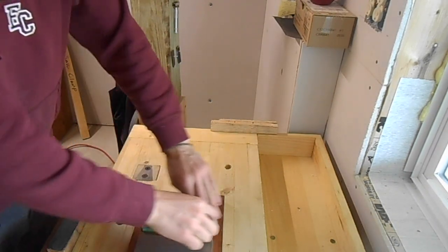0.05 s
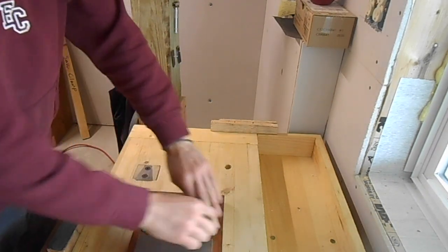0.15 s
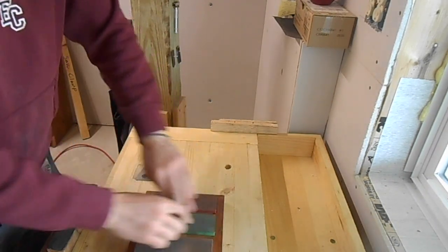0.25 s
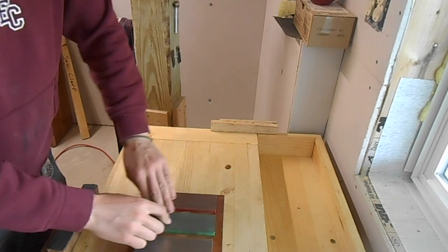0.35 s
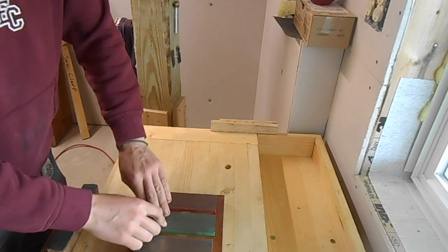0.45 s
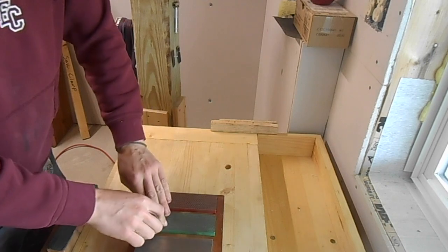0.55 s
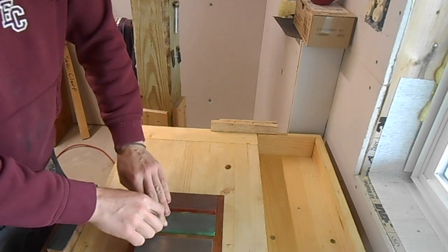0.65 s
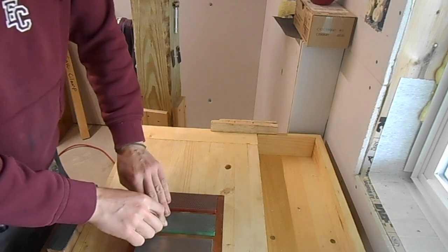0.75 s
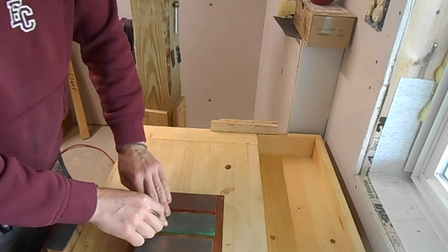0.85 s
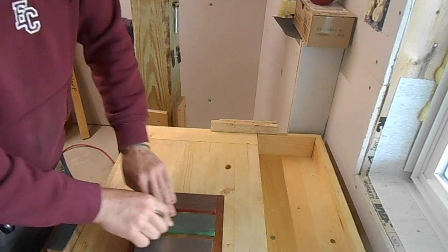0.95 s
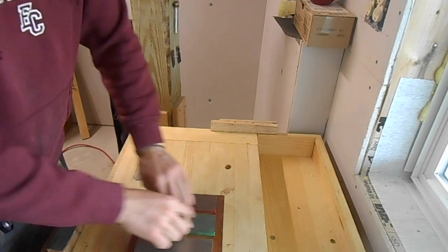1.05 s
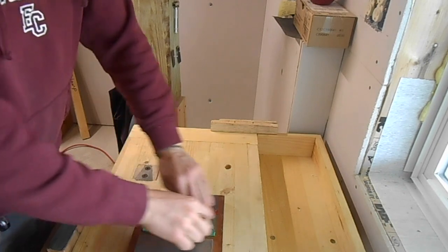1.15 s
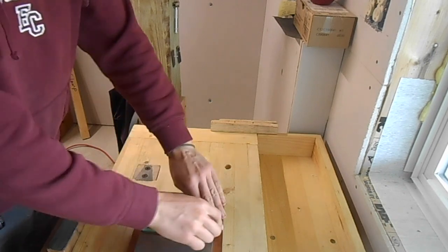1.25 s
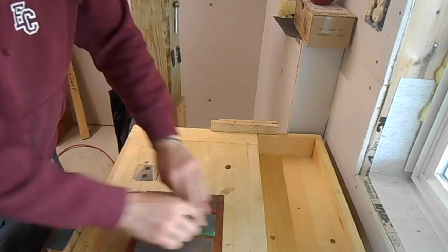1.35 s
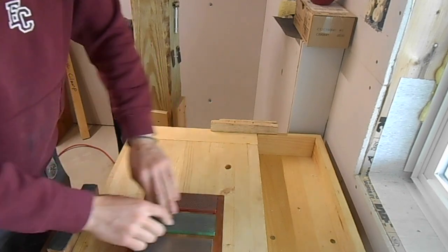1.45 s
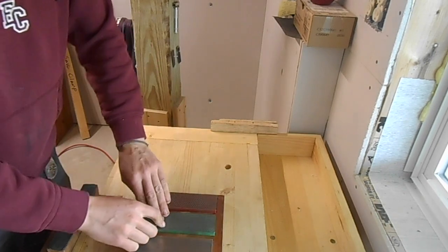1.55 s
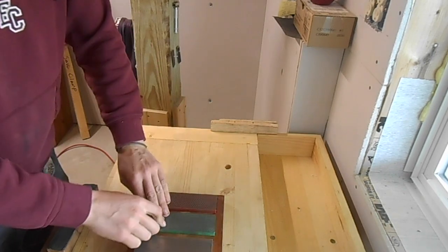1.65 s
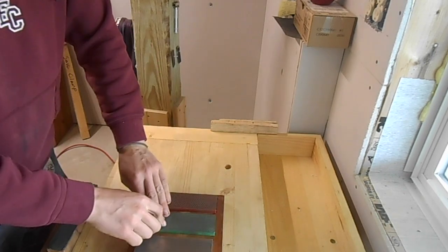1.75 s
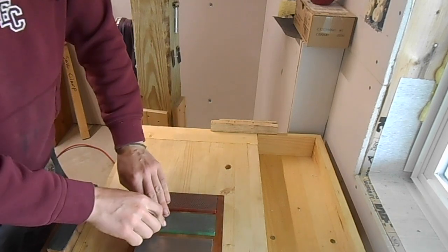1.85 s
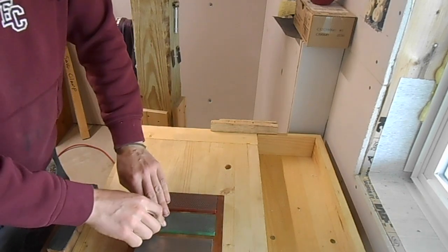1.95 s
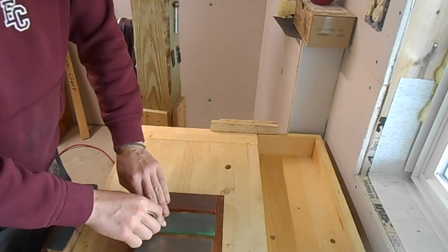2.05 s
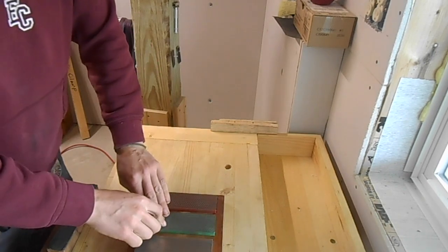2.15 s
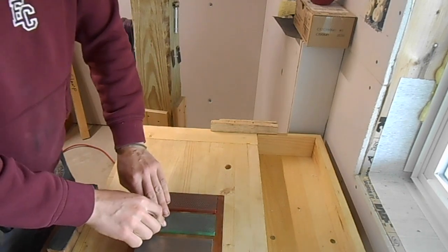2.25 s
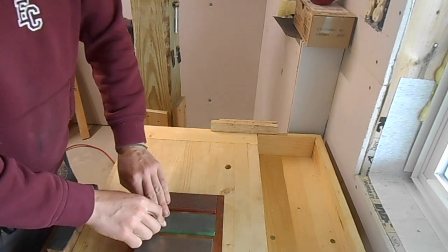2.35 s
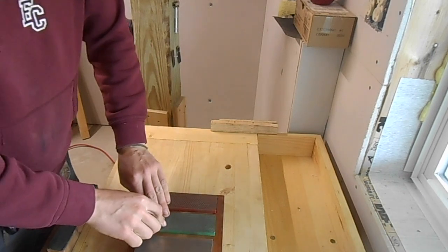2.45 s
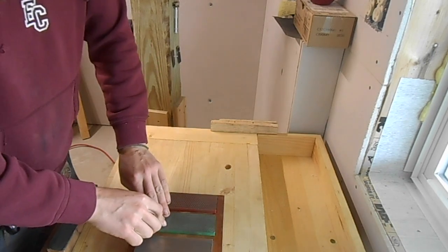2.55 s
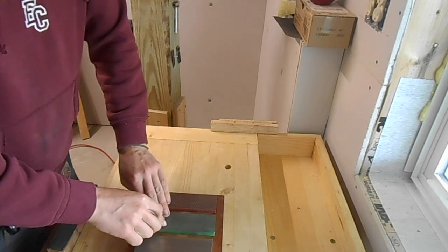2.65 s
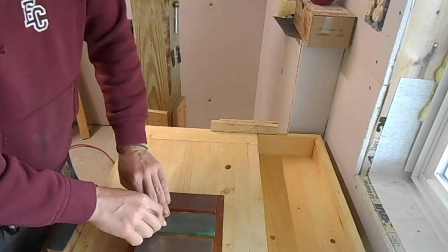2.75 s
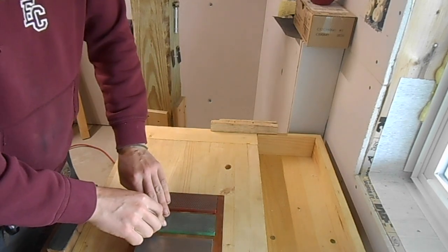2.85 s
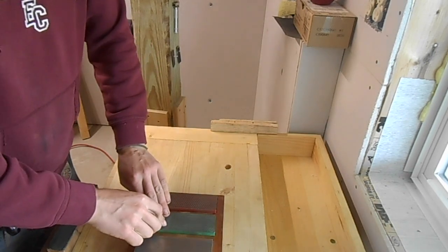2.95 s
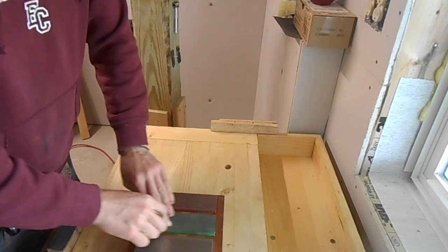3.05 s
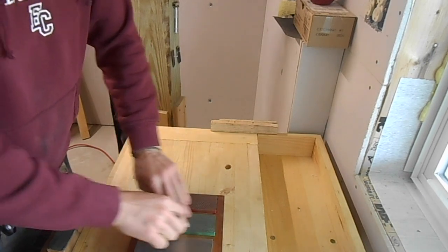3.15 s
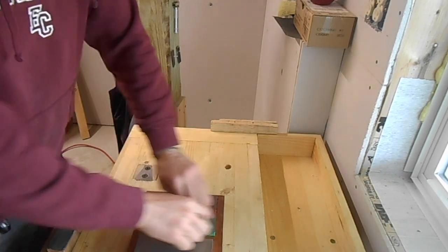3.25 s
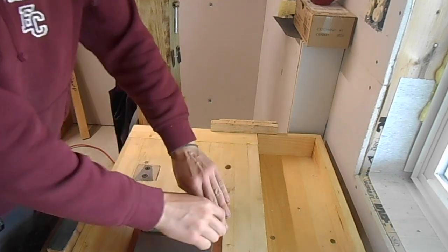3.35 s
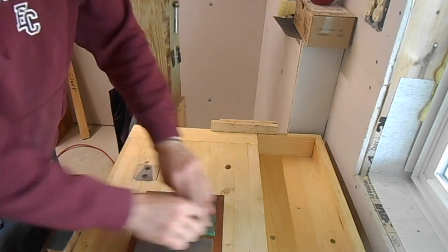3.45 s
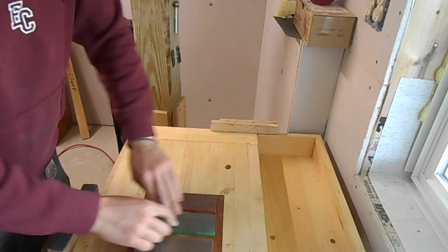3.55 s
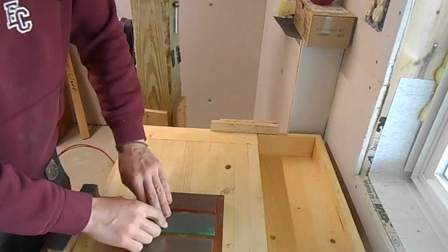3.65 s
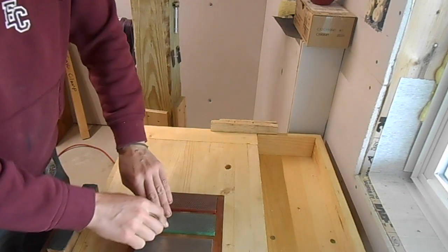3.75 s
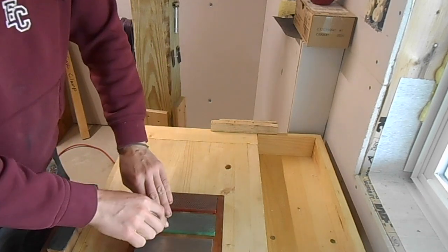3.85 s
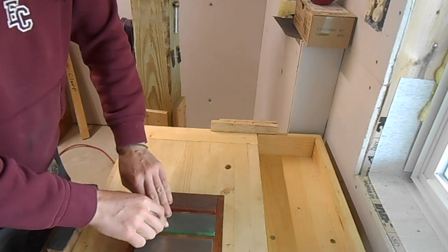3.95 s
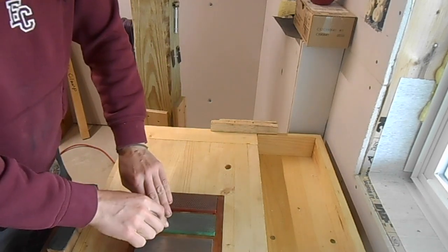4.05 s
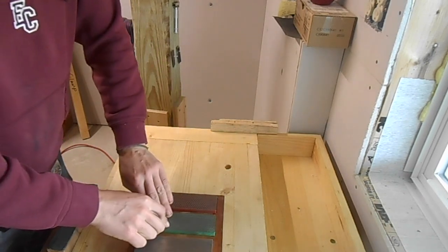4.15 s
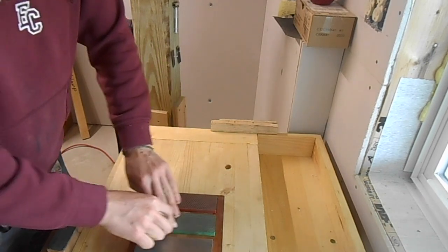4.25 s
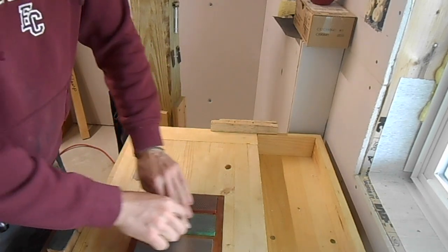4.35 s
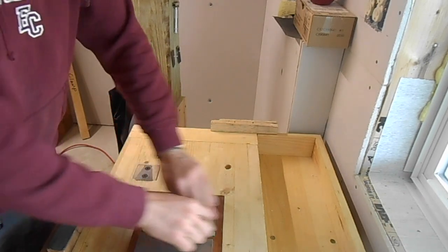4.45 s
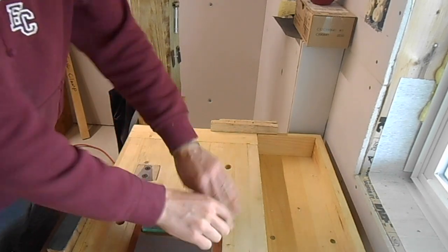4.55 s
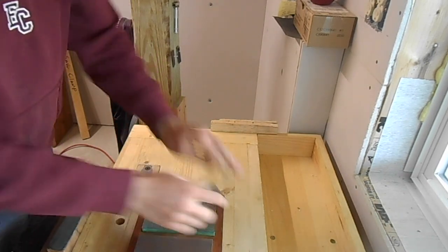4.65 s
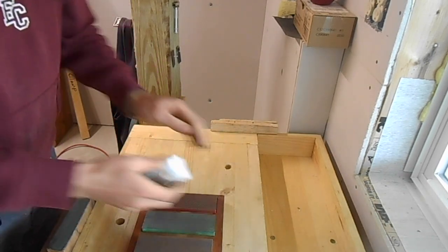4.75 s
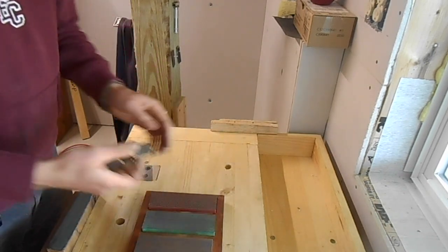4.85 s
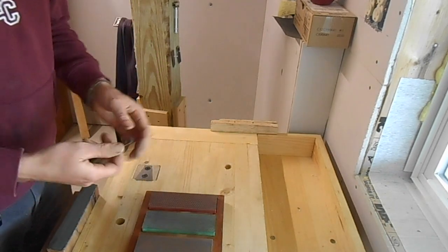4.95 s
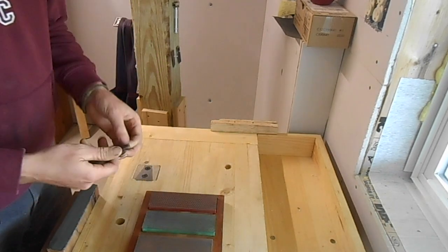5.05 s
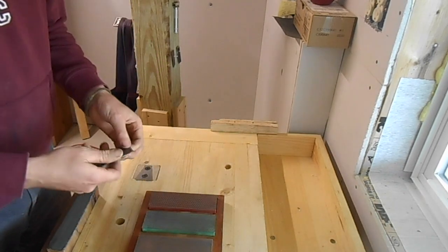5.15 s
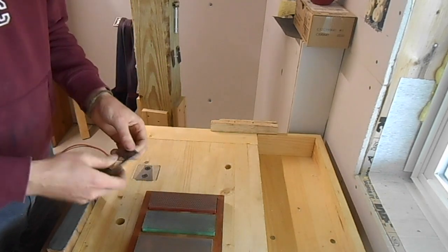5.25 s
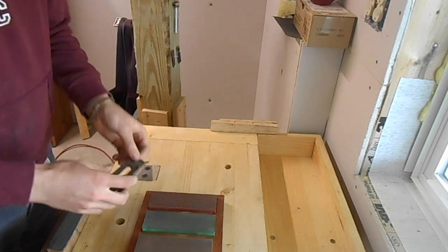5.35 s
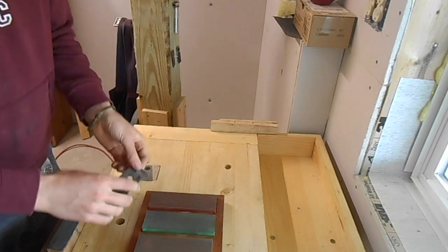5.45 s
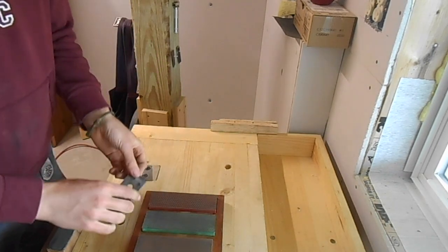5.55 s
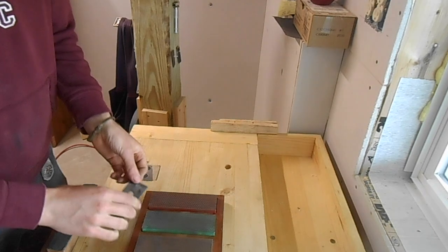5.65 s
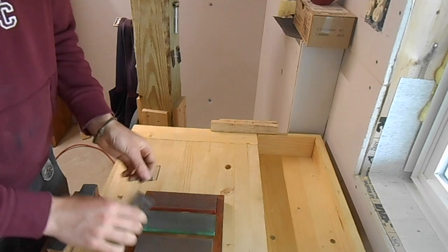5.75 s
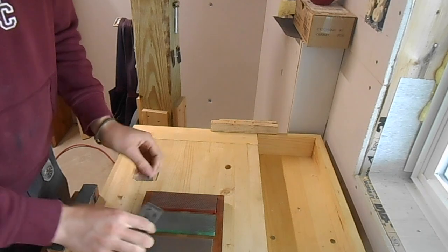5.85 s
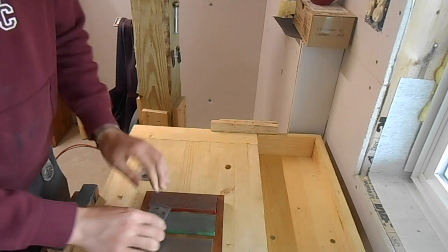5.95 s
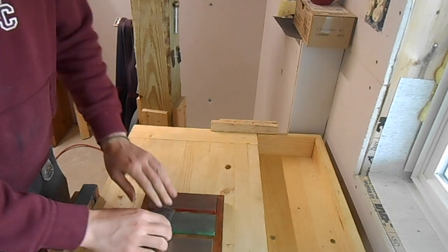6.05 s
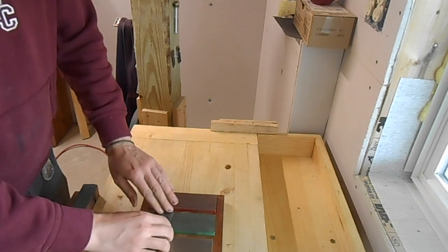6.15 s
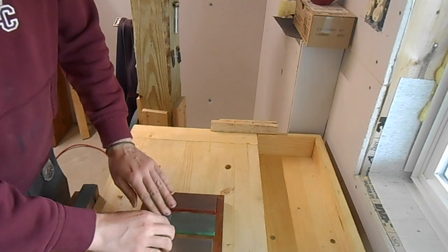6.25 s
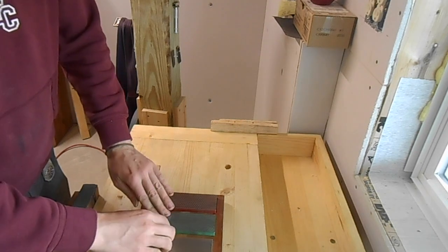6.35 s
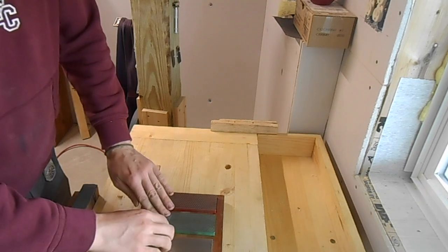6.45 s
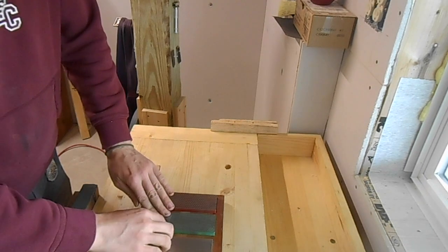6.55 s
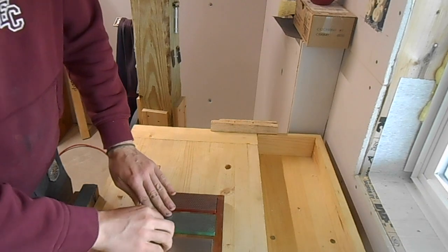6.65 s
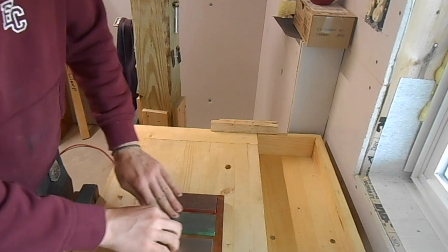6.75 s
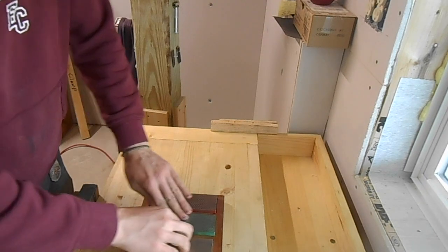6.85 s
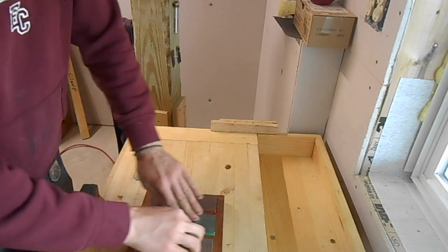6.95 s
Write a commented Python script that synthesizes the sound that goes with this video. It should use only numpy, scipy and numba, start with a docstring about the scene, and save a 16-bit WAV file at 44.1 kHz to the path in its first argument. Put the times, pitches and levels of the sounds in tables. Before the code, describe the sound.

Close up in a small, quiet workshop, steel scrapes over a gritty sharpening stone on a wooden bench. Two brief strokes, a pause, then two more, each stopping with a thump and most followed by a light metallic clack. Sleeves rustle and skin squeaks faintly over the edge. Near the end the blade touches the stone twice with a slight ring, and a lighter, more ringing rasp starts.

```python
"""Sharpening a blade at the bench

A small workshop, one microphone close to a coarse stone on a wooden bench. Grit rasps under the
steel edge; each push ends in dull knocks, and between pushes the blade is set down with a clack.
Fingers wipe the edge with faint squeaks, the blade is put back and a lighter stroke begins.
Sleeves rustle, the near walls answer briefly, and a steady room tone lies behind it all."""
import sys
import numpy as np
from scipy import signal
from scipy.fft import rfft, irfft
from scipy.io import wavfile
from scipy.ndimage import uniform_filter1d
from numba import njit

SR = 44100
rng = np.random.default_rng(int(sys.argv[2]) if len(sys.argv) > 2 else 0)


def store_pcm(level_fs):
    """Save levels as 16-bit WAV."""
    pcm = np.round(np.clip(level_fs, -1, 1) * 32767).astype(np.int16)
    wavfile.write(sys.argv[1], SR, np.atleast_2d(pcm).T)


N = 308259
TIME = np.arange(N) / SR
TOP_HZ = 10250
STROKE_RELEASE_S = 0.019

# pushes along the stone; slow start and body are relative to the level:
# start_s, length_s, bear_down_s, speed_up_s, level_db, slow_db, body_db
PUSHES = [(-0.2, 0.35, 0.08, 0.26, -35.7, -6, -2), (0.955, 0.348, 0.02, 0.2, -38.5, -6, 0.3),
          (3.041, 0.37, 0.12, 0.23, -36.5, -11, -1.8), (4.189, 0.41, 0.11, 0.32, -38, -10.5, 1)]
# resonances of the sliding blade: pitch_hz, width_hz, level_db, full_speed_rise_ratio
EDGE_PEAKS = [(1163, 80, -6.5, 0.046), (1777, 97, -5.5, 0.02), (2330, 200, -5.5, 0.03),
              (2550, 150, -13.5, .05), (3350, 360, 1.6, 0.11), (5600, 170, -14.5, 0.055),
              (6200, 120, -12, 0.033), (6820, 120, -11, .025), (7820, 180, -9.5, 0.015),
              (8800, 150, -4.5, 0.0045)]
# spectra of the grit's hiss, the rasp's body and the bench's rumble: pitch_hz, level_db
HISS_COLOUR = [(1000, -19.5), (3000, -17.5), (4200, 0.5), (4800, 3.5), (6200, -2), (7300, 0.5), (8300, 6),
               (9000, 1.5), (9900, 0), (10200, -19)]
RASP_COLOUR = [(180, -9.5), (400, -3), (600, 4), (1150, -5), (1450, -2.5), (1800, 1), (2100, 0), (2400, 1),
               (3100, 0), (4500, -4), (8000, -34)]
RUMBLE_COLOUR = [(20, -12.5), (42, 11), (53, 1.5), (76, 6), (100, -4), (128, 0.5), (170, -17.5),
                 (230, -28.5), (295, -0.5), (360, -30), (700, -35)]
# the lighter stroke: start_s, length_s, bear_down_s, level_db, slow_db
LIGHT_STROKE = (6.722, 0.4, 0.035, -32.3, -9.5)
# its spectrum: pitch_hz, level_db
LIGHT_COLOUR = [(40, -5), (100, -10), (140, -10), (185, -17.5), (388, -11), (452, -12.5), (793, -7),
                (1100, -13), (1340, -18.5), (1820, -9), (2170, -13), (3660, -7.5), (4530, -11),
                (8410, -3.5), (10200, -12)]
# its resonances: pitch_hz, width_hz, level_db
LIGHT_PEAKS = [(810, 60, -4), (1150, 65, 9), (1820, 110, 2), (3700, 150, 1), (6030, 540, 0), (8400, 500, 1)]

# knocks that end the pushes, each led by a lighter contact; hardness is a treble cut-off:
# time_s, bench_db, steel_relative_db, hardness_hz, lead_s, lead_db, lead_hardness_hz
KNOCKS = [(0.208, -17, -4, 2750, 0.012, -19, 1500), (1.342, -14, -6, 2930, 0.009, -19, 2680),
          (3.4407, -13.5, -13, 1420, 0.011, -20.5, 955), (4.6256, -13, -8.5, 2480, 0.0225, -15.5, 990)]
# the blade is set down for the next push: time_s, bench_db, steel_db, bounce_steel_db
SET_DOWNS = [(0.4931, -20, -10, -25), (1.611, -21.5, -14, -43), (3.7127, -20.5, -15.5, -19)]
# single catches and bumps of the blade: time_s, bench_db, steel_db, hardness_hz
CATCHES = [(0.076, -43, -33, 11000), (0.125, -29, -19.5, 6500), (0.182, -25.5, -50, 1000),
           (1.122, -51, -35, 11000), (3.283, -29, -31, 7000), (3.402, -37, -30.5, 5000),
           (3.408, -23.5, -50, 880), (4.537, -32.5, -27, 10000), (5.035, -44, -37.5, 10000),
           (5.164, -48, -36, 5000), (5.217, -37.5, -41, 3000), (6.746, -48, -35.5, 11000)]
# the loosely held blade touches the stone: time_s, bench_db, steel_db, free_ring_db
TOUCHES = [(6.3334, -22, -41.5, -30.5), (6.4, -21.5, -30, -27)]
# modes of stone and bench, the hand-damped blade and the loose blade: pitch_hz, level_db, t60_s
BENCH_MODES = [(129.6, -12.5, 0.54), (299, -5, 0.16), (421, -7.5, 0.39), (463.4, -12, 0.36),
               (567, -3, 0.076), (686, -4.5, 0.07), (793, -5, 0.08), (1000, -3, 0.091), (1096, -1.5, 0.089),
               (1210, -4, 0.061), (1594, -11.5, 0.09), (1786, -7.5, 0.079), (1888, -9, 0.08)]
GRIPPED_MODES = [(2526, -2.5, 0.045), (2797, -1.5, 0.036), (3460, -1, 0.019), (3895, -4.5, 0.036),
                 (4690, -1, 0.05), (5170, 3, 0.057), (5205, -5.5, 0.02), (6300, -2, .03), (7200, -0.5, .03),
                 (8230, -7, 0.033), (8660, 5.5, 0.031)]
LOOSE_MODES = [(1690, 5, 0.15), (2870, -10, .05), (3900, -14.5, 0.22), (4640, -17, 0.06), (7030, -5, 0.02)]
# spectra of the struck bench and the struck steel: pitch_hz, level_db
BENCH_COLOUR = [(60, -7), (120, -10.5), (210, -19.5), (300, -14), (420, -4.5), (580, 0.5), (700, 1.5),
                (900, -3.5), (1100, -5.5), (1400, -15), (1900, -13), (3000, -17.5), (6000, -50)]
STEEL_COLOUR = [(400, -23.5), (1000, 0.5), (1450, -5.5), (1850, 2), (2300, -10), (2700, 0.5), (3150, -3),
                (3600, 1.5), (4500, -3), (5800, -0.5), (7500, 1), (8700, 2.5), (10200, -4)]

# fingers drag over the edge: start_s, length_s, level_db, squeak_relative_db
WIPES = [(4.868, 0.14, -43, -8.5), (4.953, 0.035, -44, -9), (5.029, 0.023, -42.5, 8),
         (5.061, 0.1, -42.5, -3), (5.111, 0.022, -50, 10.5)]
# resonances of skin squeaking on steel: pitch_hz, width_hz, level_db
SQUEAK_PEAKS = [(5890, 150, -1), (6600, 200, -3), (7100, 140, -8), (7600, 260, -21)]
# the arms draw back or handle the blade: loudest_s, rise_s, fade_s, level_db
ARM_MOVES = [(0.33, 0.18, 0.4, -47.5), (1.48, 0.063, 0.63, -55), (3.6, 0.21, 0.33, -47),
             (4.92, 0.44, 0.49, -44.5), (5.3, 0.21, 0.43, -47.5), (6.52, 0.31, 0.7, -48.5)]
# spectra of wiping skin, sleeves and room tone: pitch_hz, level_db
WIPE_COLOUR = [(300, -11), (1200, 1.5), (2200, -4), (4000, 0.5), (5200, -3), (7000, 0), (9000, 1),
               (10200, -6.5)]
SLEEVE_COLOUR = [(18, -28), (30, -12), (43, -2), (222, -14), (408, -9), (697, -11), (750, -5), (1280, -12),
                 (2040, -7.5), (2420, -17), (4300, -20.5), (5200, -23), (8390, -19), (10200, -28)]
ROOM_TONE_COLOUR = [(15, -50), (25, 4.5), (149, -9.5), (229, -10), (287, -12.5), (398, -5.5), (692, -6.5),
                    (765, -2), (867, -10), (1030, -8), (1750, -9), (2040, -5.5), (2370, -19), (2560, -15),
                    (10200, -25)]
# hollow resonances in the room tone: pitch_hz, width_hz, level_db
ROOM_TONE_PEAKS = [(794, 14, -3), (977, 130, 1.5), (2015, 190, -4.5), (2556, 57, 8.5), (8250, 1200, 3)]


def pushes(bite_db=2.5, bite_s=0.069, far_end_db=4, far_end_s=0.038, shake_release_s=0.14):
    """Grit hisses under the edge, rasps through blade and stone, and shakes the bench."""
    gain, body, shake, speed = np.zeros((4, N))
    for start, length, bear_down_s, speed_up_s, db, slow_db, body_db in PUSHES:
        pressure = envelope(start, length, bear_down_s, STROKE_RELEASE_S)
        shaking = envelope(start, length, bear_down_s, shake_release_s)
        pace = stroke_speed(start, speed_up_s)
        slowness = 1 - pace
        # the edge bites hardest on reaching full speed
        bite = np.exp(-((TIME - start - speed_up_s) / bite_s) ** 2)
        level = undb(db + slow_db * slowness + bite_db * bite)
        gain += pressure * level
        # the rasp starts thin and gains body towards the far end of the stone
        far_end = np.exp(-np.maximum(start + length - TIME, 0) / far_end_s)
        body += pressure * level * undb(body_db - 4 * slowness + far_end_db * far_end)
        shake += shaking * level * undb(body_db - 6.5 * slowness)
        speed += pressure * pace ** 4
    grains = grit(per_s=9800, spread_db=2.0, judder_db=1.06, judder_hz=55)
    hiss = patchy(colour(grains, HISS_COLOUR), depth_db=3.0)
    coarse_grains = grit(per_s=5000, spread_db=0.5, judder_db=2.0)
    rasp = patchy(colour(coarse_grains, RASP_COLOUR), depth_db=1.65)
    treble = undb(-3.0) * hiss + undb(-0.5) * edge_ring(grains, speed)
    rumble = unit(colour(rng.standard_normal(N), RUMBLE_COLOUR))
    return gain * treble + undb(-1.5) * body * rasp + undb(-4.0) * shake * rumble


def edge_ring(grains, speed, wander=0.025, wander_hz=11, swell_db=2.5):
    """The blade's resonances climb with speed, and come and go as the contact shifts along the edge."""
    ringing = np.zeros(N)
    for hz, width, db, rise in EDGE_PEAKS:
        level = undb(db + swell_db * walk(wander_hz))
        pitch_hz = hz * (1 + rise * speed + wander * walk(wander_hz))
        ringing += level * unit(bandpass(grains, pitch_hz, float(width)))
    return unit(ringing)


def light_stroke():
    """With less of the edge on the stone the rasp is thinner and rings more."""
    start, length, bear_down_s, db, slow_db = LIGHT_STROKE
    slowness = 1 - stroke_speed(start, speed_up_s=0.19)
    gain = envelope(start, length, bear_down_s, STROKE_RELEASE_S) * undb(db + slow_db * slowness)
    grains = colour(grit(per_s=8900, spread_db=1.5, judder_db=0.5), LIGHT_COLOUR)
    return gain * patchy(grains + resonate(grains, LIGHT_PEAKS), depth_db=2.5)


def stroke_speed(start, speed_up_s):
    """The hands accelerate from rest (0) to full speed (1)."""
    return np.sin(np.pi / 2 * np.clip((TIME - start) / speed_up_s, 0, 1))


def grit(per_s, spread_db, judder_db, judder_hz=70):
    """Tiny fractures of uneven size, swelling as the contact catches and slips."""
    happens = rng.random(N) < per_s / SR
    sizes = undb(spread_db * np.minimum(rng.exponential(size=N), 6))
    return unit(happens * sizes * rng.standard_normal(N)) * undb(judder_db * walk(judder_hz))


def patchy(x, depth_db, rate_hz=28, band_count=9):
    """Grit is uneven: each patch of stone stresses other parts of the treble."""
    hz = np.fft.rfftfreq(N, 1 / SR)
    centres = np.linspace(0, TOP_HZ, band_count)
    spectrum = rfft(x)
    bands = [irfft(spectrum * np.interp(hz, centres, band), N) for band in np.eye(band_count)]
    return unit(sum(band * undb(depth_db * walk(rate_hz)) for band in bands))


def contacts(rebound_s=0.016, flat_s=0.0065, bounce_s=0.0225):
    """Every blow of blade on stone: time_s, bench_db, steel_db, hardness_hz."""
    rows = list(CATCHES)
    for s, db, steel_db, hz, lead_s, lead_db, lead_hz in KNOCKS:
        rows += [(s - lead_s, lead_db, lead_db + steel_db - 7, lead_hz),
                 (s, db, db + steel_db, hz),
                 (s + rebound_s, db - 10, db + steel_db - 10, hz * 0.77)]
    # set down, the edge lands hard, the bevel drops flat, then the blade bounces once
    for s, bench_db, steel_db, bounce_db in SET_DOWNS:
        rows += [(s, bench_db, steel_db, 11000),
                 (s + flat_s, bench_db + 0.5, steel_db - 7.5, 4670),
                 (s + bounce_s, bench_db - 2.5, bounce_db, 3100)]
    return rows + [(s, bench_db, steel_db, 10200) for s, bench_db, steel_db, _ in TOUCHES]


def bench_and_steel(t):
    """Struck bench and blade each give a burst of crowded modes around a few clear ones."""
    wood, metal, tick = rng.standard_normal((3, len(t)))
    thud = undb(-3) * signal.unit_impulse(len(t)) + unit_energy(wood * decay(t, t60=0.056))
    clack = unit_energy(tick * decay(t, t60=0.022)) + unit_energy(metal * decay(t, t60=0.032))
    bench = unit_energy(colour(thud, BENCH_COLOUR)) + undb(-3) * ring(BENCH_MODES, t, scatter_db=2.5)
    steel = unit_energy(colour(clack, STEEL_COLOUR)) + undb(-8) * ring(GRIPPED_MODES, t, scatter_db=5)
    return bench, steel


def blows(level_window_s=0.005):
    """Each contact rings bench and blade; a softer contact leaves out the treble."""
    t = TIME[:SR // 2]
    track = np.zeros(N + len(t))
    for s, bench_db, steel_db, hardness_hz in contacts():
        bench, steel = bench_and_steel(t)
        treble_cut = signal.butter(4, min(hardness_hz / SR, .45), fs=1, output="sos")
        # a brief, hard contact hardly moves the heavy bench
        bass_cut = signal.butter(1, hardness_hz / 14, btype="high", fs=SR, output="sos")
        contact = np.vstack([treble_cut, bass_cut])
        start = int(s * SR)
        for part, db in ((bench, bench_db), (steel, steel_db)):
            track[start:start + len(t)] += undb(db) * unit_energy(signal.sosfilt(contact, part))
    for s, _, _, free_ring_db in TOUCHES:
        start = int(s * SR)
        track[start:start + len(t)] += undb(free_ring_db) * ring(LOOSE_MODES, t, scatter_db=4.0)
    # a broad low boost gives the knocks their thump
    boosted = colour(track[:N],
                     [(40, -1.0), (128, 4.5), (165, 5), (240, 2), (320, 2), (500, 1.5), (700, 0)])
    return boosted * np.sqrt(level_window_s * SR)


def finger_wipes():
    """Skin drags over the gritty edge and squeaks."""
    drag_gain, squeak_gain = np.zeros((2, N))
    for start, length, db, squeak_db in WIPES:
        gain = undb(db) * envelope(start, length, attack_s=0.0038, release_s=0.0094)
        drag_gain += gain
        squeak_gain += gain * undb(squeak_db)
    slips = grit(per_s=3800, spread_db=1.0, judder_db=1.5)
    drag = drag_gain * unit(colour(slips, WIPE_COLOUR))
    squeak = squeak_gain * unit(resonate(slips, SQUEAK_PEAKS))
    return undb(-1.5) * (drag + squeak)


def sleeves():
    """Cloth rustles as the arms move."""
    moving = sum(undb(db) * envelope(s - rise_s, rise_s, rise_s, fade_s)
                 for s, rise_s, fade_s, db in ARM_MOVES)
    rubbing = grit(per_s=11000, spread_db=1.0, judder_db=0.5)
    return moving * unit(colour(rubbing, SLEEVE_COLOUR))


def workshop(direct, early_db=-6, late_db=-11):
    """Bench top and near walls answer at once; the small room rings on, a little duller."""
    t = TIME[:SR]
    near, far = rng.standard_normal((2, SR))
    early = unit_energy(near * decay(t, t60=0.11) * (t > .003))
    late = unit_energy(far * decay(t, t60=0.5) * (t > .012))
    dull_late = colour(late, [(150, 1.0), (700, 4.5), (2000, -1.0), (8000, -4)])
    response = undb(early_db) * early + undb(late_db) * dull_late
    return (direct + signal.fftconvolve(direct, response)[:N]) * undb(-0.92)


def room_tone(level_db=-52):
    """Steady background with a few hollow resonances."""
    noise = colour(rng.standard_normal(N), ROOM_TONE_COLOUR)
    return undb(level_db) * unit(noise + resonate(noise, ROOM_TONE_PEAKS))


def ring(modes, t, scatter_db):
    """Modes of a struck body; their shares change with the point of contact."""
    chance = rng.standard_normal((len(modes), 2))
    ringing = np.zeros(len(t))
    for (hz, db, t60), (share, side) in zip(modes, chance):
        amplitude = np.sign(side) * undb(db + scatter_db * share) / np.sqrt(t60)
        ringing += amplitude * decay(t, t60) * np.sin(2 * np.pi * hz * t)
    return unit_energy(ringing)


def resonate(x, peaks):
    """Sum of steady resonances."""
    return sum(undb(db) * bandpass(x, np.full(N, float(hz)), float(width)) for hz, width, db in peaks)


@njit
def bandpass(x, hz, width):
    """State-variable resonance whose centre may move."""
    y, band_state, low_state = np.empty(len(x)), 0., 0.
    for i in range(len(x)):
        tuning, damping = np.tan(np.pi * hz[i] / SR), width / hz[i]
        band = (band_state + tuning * (x[i] - low_state)) / (1 + tuning * (tuning + damping))
        band_state = 2 * band - band_state
        low_state += 2 * tuning * band
        y[i] = damping * band
    return y


def colour(x, points, size=4096):
    """Causal filter with the given outline: pitch_hz, level_db."""
    hz, db = np.transpose(points)
    grid_hz = np.maximum(np.arange(size // 2 + 1) * SR / size, 1)
    gain = undb(np.interp(np.log(grid_hz), np.log(hz), db))
    cepstrum = irfft(np.log(gain))
    folded = np.r_[cepstrum[0], 2 * cepstrum[1:size // 2]]
    return signal.fftconvolve(x, irfft(np.exp(rfft(folded, size))))[:len(x)]


def envelope(start, length, attack_s, release_s):
    """Smooth attack, hold until the length is over, then die away."""
    age = TIME - start
    attack = np.sin(np.pi / 2 * np.clip(age / attack_s, 0, 1)) ** 2
    return attack * np.exp(-np.maximum(age - length, 0) / release_s)


def walk(rate_hz):
    """Smooth random drift with rms 1."""
    hold = int(SR / rate_hz)
    steps = np.repeat(rng.standard_normal(N // hold + 1), hold)
    return unit(uniform_filter1d(steps, hold)[:N])


def decay(t, t60):
    """Fall by 60 dB in t60 seconds."""
    return np.exp(-np.log(1000) * t / t60)


def undb(db):
    """Decibels to amplitude."""
    return 10 ** (np.asarray(db) / 20)


def unit(x):
    """Scale to rms 1."""
    return x / np.sqrt(np.mean(x ** 2))


def unit_energy(x):
    """Scale a response so that it passes noise at the same power."""
    return x / np.sqrt(np.sum(x ** 2))


def scene():
    """The work at the bench and the room around it, in mono at the microphone."""
    at_bench = pushes() + light_stroke() + blows() + finger_wipes() + sleeves()
    return (workshop(at_bench) + room_tone())[None]


def record(dry):
    """The recorder rounds the loudest peaks and cuts the top steeply."""
    ceiling = .7
    rounded = ceiling * np.tanh(dry / ceiling)
    return signal.sosfilt(signal.ellip(10, .3, 70, TOP_HZ, fs=SR, output="sos"), rounded)


dry = scene()
out = record(dry)
store_pcm(out)
```